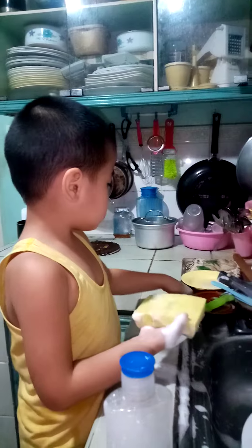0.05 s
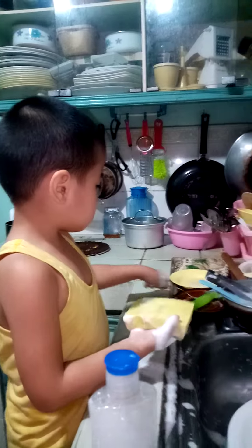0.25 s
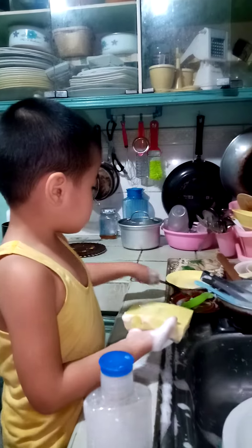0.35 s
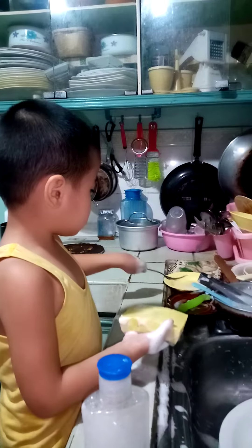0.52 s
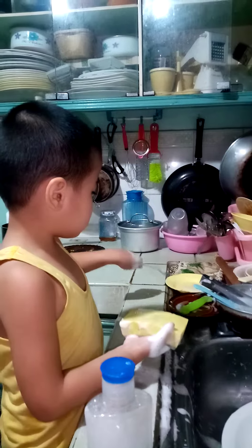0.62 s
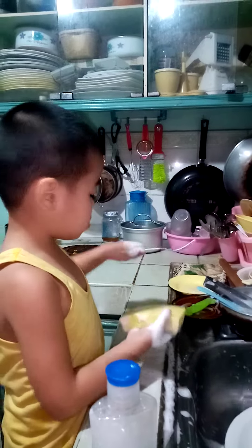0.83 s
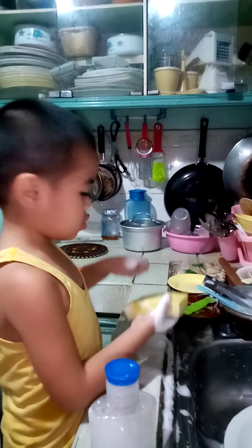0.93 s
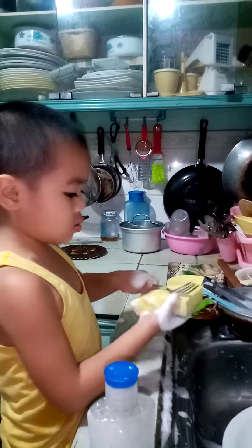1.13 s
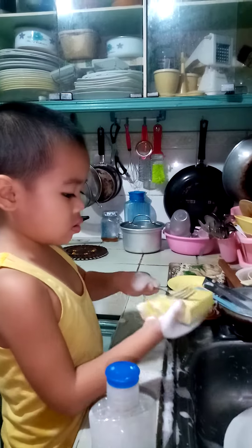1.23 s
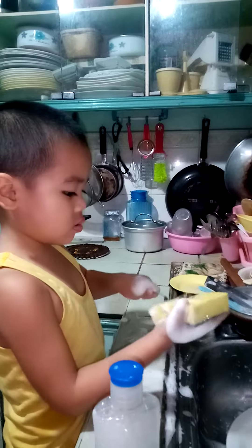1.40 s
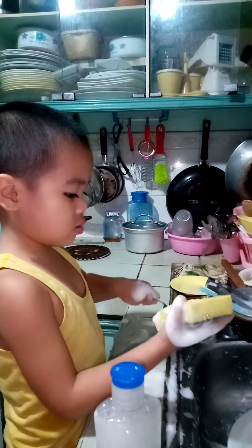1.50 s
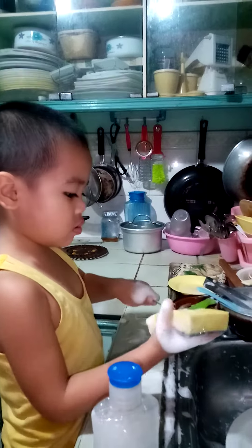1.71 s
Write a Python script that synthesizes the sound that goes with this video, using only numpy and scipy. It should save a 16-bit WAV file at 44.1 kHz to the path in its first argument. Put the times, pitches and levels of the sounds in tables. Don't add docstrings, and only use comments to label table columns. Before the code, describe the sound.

A steel fork clatters on a tiled kitchen counter. Faint water murmur and tiny suds pops open; from 0.2 to 0.4 seconds the fork scrapes and jangles. At 0.45 it drops loudly, bouncing and rattling until about 0.75, with ringing dishes and dull knocks. Damped near 0.8, it gives way to sponge fizz, sparse bubble pops, and a faint dull rub from 1.64, in a small hard room.

```python
import sys
import numpy as np
from scipy import signal
from scipy.fft import rfft, irfft, next_fast_len
from scipy.io import wavfile
from scipy.ndimage import uniform_filter1d

SR = 44100
rng = np.random.default_rng(int(sys.argv[2]) if len(sys.argv) > 2 else 0)


def inscribe(sig):
    pcm = np.round(np.clip(np.atleast_2d(sig).T, -1, 1) * 32767)
    wavfile.write(sys.argv[1], SR, pcm.astype(np.int16))


def natural_amplitude(level_db):
    exponent = np.asarray(level_db, float) / 20
    return 10 ** exponent


N = 77175
TIME = np.arange(N) / SR


def colour(x, points):
    hz, db = np.transpose(points)
    size = next_fast_len(N + 4096)
    at = np.log(np.arange(size // 2 + 1) * SR / size + 1)
    gain = natural_amplitude(np.interp(at, np.log(hz), db))
    return irfft(rfft(x, size) * gain, size)[..., :N]


def rms_one(x):
    return x / np.sqrt(np.mean(x ** 2) + 1e-20)


def noise():
    return rng.standard_normal((2, N))


def ring(clicks, hz, t60):
    r, w = natural_amplitude(-60 / (t60 * SR)), 2 * np.pi * hz / SR
    return signal.lfilter([0, np.sin(w)], [1, -2 * r * np.cos(w), r * r], clicks + 1e-18)


def grains(per_s, spread_db):
    sizes = natural_amplitude(spread_db * np.minimum(rng.exponential(1, (2, N)), 4))
    sizes = sizes * rng.choice([-1, 1], (2, N))
    return rms_one(sizes * (rng.random((2, N)) < per_s / SR))


def burst(start, rise, t60):
    t = np.maximum(TIME - start, 0)
    return (1 - np.exp(-t / max(rise, 1e-4))) * natural_amplitude(-60 * t / max(t60, .005))


def slosh():
    # pitch_hz, level_db per Hz
    water = [(41, -46), (70, -10), (162, 2), (204, -7), (239, -3.5), (1250, -11), (1470, -12.5),
             (4280, -7.5), (16000, -20)]
    settling = burst(-0.057, 0.0072, 2.4)
    fade_out = np.clip((.5 - TIME) / 0.09, 0, 1)
    return natural_amplitude(-45) * rms_one(colour(noise(), water)) * settling * fade_out


def hum():
    # pitch_hz, level_db per Hz
    background = [(24, -23), (40, -6), (118, 0), (873, -20.5), (3300, -43), (4130, -23), (6490, -19),
                  (13400, -32), (16000, -41)]
    return natural_amplitude(-67.5) * rms_one(colour(noise(), background))


def pops():
    # start_s, peak level_db, pitch_hz, breadth_octaves
    suds = [(0.032, -32, 4220, 0.023), (0.056, -41, 4630, 0.04), (0.081, -40.5, 2490, 0.14),
            (0.771, -45.5, 754, 0.094), (0.816, -42.5, 8640, 0.15), (0.863, -38.5, 13200, 3.2),
            (0.871, -40.5, 6750, 0.22), (0.89, -43, 7800, 0.76), (0.927, -41.5, 5350, 0.11),
            (0.96, -41, 7100, 0.86), (0.968, -49.5, 1224, 0.2), (1.023, -32, 10100, 0.82),
            (1.034, -50.5, 4400, 0.13), (1.063, -42, 6500, 0.27), (1.075, -53, 1920, 0.19),
            (1.096, -42, 7360, 0.71), (1.214, -50.5, 6200, 0.87), (1.204, -58, 7500, 0.33),
            (1.271, -53.5, 8700, 0.21), (1.275, -49, 6460, 0.25), (1.279, -49, 4940, 0.58),
            (1.28, -58.5, 2270, 0.2), (1.287, -54, 4520, 0.52), (1.295, -54, 4400, 0.81),
            (1.296, -56, 2310, 0.14), (1.371, -51.5, 6060, 0.25), (1.399, -45, 6300, 0.31),
            (1.399, -42.5, 8660, 0.22), (1.402, -46, 4220, 0.43), (1.453, -46.5, 2610, 0.31),
            (1.454, -42, 5100, 0.56), (1.456, -56, 1614, 0.13), (1.471, -40.5, 3800, 0.41),
            (1.49, -40, 6160, 0.44), (1.458, -47, 5230, 0.24), (1.501, -49, 6300, 0.15),
            (1.519, -44.5, 5660, 0.36), (1.522, -51, 3700, 0.23), (1.532, -45, 4150, 0.35),
            (1.545, -51.5, 2600, 0.47), (1.545, -53, 9150, 0.25), (1.55, -52, 4000, .2),
            (1.565, -46, 5270, 0.27), (1.598, -46, 3950, 0.2), (1.662, -45.5, 5130, 0.45)]
    level_db, spray_db = 0.5, -16
    puff_t60_s, puff_min_cycles, puff_rise_s = .011, 40, .0006
    spray_t60_s, spray_rise_s = .14, .004
    out, white = 0, noise()
    for s, db, hz, breadth in suds:
        edge = 2 ** (max(breadth, .01) / 2)
        limits = [hz / edge, min(hz * edge, .45 * SR)]
        band = signal.butter(3, limits, "band", fs=SR, output="sos")
        puff = burst(s, puff_rise_s, max(puff_t60_s, puff_min_cycles / hz))
        spray = natural_amplitude(spray_db) * burst(s, spray_rise_s, spray_t60_s)
        out = out + natural_amplitude(db + level_db) * rms_one(signal.sosfilt(band, white)) * (puff + spray)
    return out


def crockery(shake):
    t60_s, level_db = .06, 5
    pitches = np.geomspace(900, 14000, 36) * rng.uniform(.96, 1.04, 36)
    peak = t60_s * SR / (2 * np.log(1000))
    dishes = sum(ring(shake, hz, t60_s) for hz in pitches) / peak
    return rms_one(shake + natural_amplitude(level_db) * dishes)


def fork(contacts, pitches, modes, ring_db, tile, tile_db):
    touches_per_s, touch_spread_db, strike_spread_db = 3000, 2.0, 2.0
    first_blow_db = 22
    fall_db_per_octave, floor_db = 45, -15
    force = np.array([natural_amplitude(db) * burst(s, rise, t60) for s, db, rise, t60, _ in contacts])
    octaves = np.abs(np.log2(np.array(contacts)[:, 4:] / pitches))
    nearness_db = np.maximum(-fall_db_per_octave * octaves, floor_db)
    strength = natural_amplitude(strike_spread_db * rng.standard_normal(octaves.shape) + nearness_db)
    touches = grains(touches_per_s, touch_spread_db)
    shake = crockery(colour(.5 * touches + noise(), tile)) * force.sum(axis=0)
    blows = [int((c[0] + c[2]) * SR) for c in contacts]
    touches[:, blows] = natural_amplitude(first_blow_db)
    steel = 0
    for k, (db, t60) in enumerate(modes):
        push = touches * (strength[:, k] @ force)
        steel = steel + natural_amplitude(db) * ring(push, pitches[k], t60) / np.sqrt(t60 * SR / 28)
    return natural_amplitude(ring_db) * steel + natural_amplitude(tile_db) * shake


def dragged_fork():
    # start_s, peak level_db, rise_s, t60_s, struck pitch_hz
    drags = [(.19, -33, 0.0023, 0.19, 6730), (.213, -28.5, 0.0021, 0.22, 5280),
             (.221, -25, 0.003, 0.054, 8350), (.23, -26.5, .003, 0.045, 1794),
             (.247, -27, 0.0046, 0.35, 3732), (.279, -20.5, 0.0022, 0.14, 3732),
             (.288, -21, .002, 0.035, 8330), (.303, -24.5, 0.0017, 0.13, 6470),
             (.314, -26, .003, 0.13, 8330), (.325, -21.5, 0.0055, 0.058, 5900),
             (.333, -27, .003, 0.16, 3732), (.337, -24, 0.0035, 0.035, 6730),
             (.342, -44, 0.0026, 0.16, 1729), (.35, -31, 0.0024, 0.13, 5860),
             (.362, -51, .003, 0.087, 8330), (.37, -27, 0.0025, 0.11, 3732), (.39, -37, 0.016, 1, 4300)]
    held_hz = [1729, 1794, 3732, 4270, 5634, 5842, 5886, 6729, 6690, 8330, 8428, 10030, 11120, 15190]
    # level_db, t60_s
    held = [(-5, .07), (-7, .05), (-6, .035), (-9, .05), (-10, .05), (-5, .06), (-5, .06), (-1, .06),
            (-7, .06), (1, .07), (-8, .05), (-8, .07), (-12, .07), (-14, .05)]
    # pitch_hz, level_db per Hz
    tile = [(41, -39), (70, -23), (129, 4.5), (853, -9), (1760, -6), (3040, -6.5), (6750, 2.5),
            (11900, -5.5), (16000, -0.5)]
    return fork(drags, held_hz, held, -9, tile, -12)


def knocks():
    # start_s, peak level_db
    blows = [
        (.222, -56.5),
        (.281, -39),
        (0.301, -43),
        (.455, -42),
        (.5, -39.5),
        (0.577, -48),
        (0.655, -52),
    ]
    # pitch_hz, level_db, t60_s
    slab = [(131, -6.5, 0.19), (163, -2, 0.31), (231, 0, .15), (288.6, -2.5, 0.22), (461.4, 0, .1)]
    push = np.zeros(N)
    for s, db in blows:
        push[int(s * SR)] = natural_amplitude(db)
    push = signal.sosfilt(signal.butter(2, 90, "high", fs=SR, output="sos"), push)
    ringing = sum(natural_amplitude(db) * ring(push, hz, t60) for hz, db, t60 in slab)
    return uniform_filter1d(ringing, size=41)


def dropped_fork():
    # start_s, peak level_db, rise_s, t60_s, struck pitch_hz
    drops = [(.452, -14, 0.0014, 0.06, 7300), (.465, -11, 0.0017, 0.039, 4000),
             (.471, -21.5, 0.003, 0.13, 6700), (.481, -22, .002, 0.11, 4262),
             (.497, -22, 0.0032, 0.067, 5875), (.499, -23.5, 0.0038, 0.14, 4262),
             (.505, -29, .002, .06, 6700), (.521, -27, .003, 0.16, 6200), (.532, -25.5, 0.0058, 0.34, 3705),
             (.571, -20, 0.0025, 0.097, 4200), (.577, -24.5, 0.0014, 0.13, 6700),
             (.603, -21, 0.0044, 0.07, 3705), (.612, -36.5, .003, 0.087, 6750),
             (.635, -27, 0.0058, 0.15, 3705), (.654, -19, 0.0018, 0.055, 4262),
             (.672, -30, 0.0035, 0.34, 5200), (.69, -36.5, 0.0031, 0.1, 8340),
             (.713, -28, 0.001006, 0.057, 4262), (.735, -37, .005, 0.24, 4262),
             (.738, -54, .005, 0.13, 6800)]
    free_hz = [780, 1674, 3250, 3705, 4170, 4262, 5875, 6692, 6752, 8340, 10080, 11170, 12062, 14255]
    # level_db, t60_s
    free = [(-9, .25), (-6, .08), (-12, .05), (-1, .12), (-14, .06), (2, .055), (-1, .08), (-2, .07),
            (-4, .07), (-2, .1), (-4, .12), (-6, .12), (-4, .14), (-6, .12)]
    # pitch_hz, level_db per Hz
    tile = [(41, -42), (70, -7), (280, 2.5), (3040, -5.5), (4280, 4), (4580, -0.5), (6750, 4.5),
            (10600, -4), (16000, -1.5)]
    return fork(drops, free_hz, free, -9, tile, -8.5)


def fizz():
    # time_s, level_db
    squeeze = [
        (0.75, -44),
        (0.956, -58.5),
        (1.078, -57),
        (1.176, -69),
        (1.346, -69.5),
        (1.612, -59.5),
        (1.75, -67),
    ]
    # pitch_hz, level_db per Hz
    foam = [(410, -4), (700, -10.5), (886, -16), (1260, -8), (3280, -9), (6480, -7.5), (13500, -13.5),
            (15000, -11), (16000, -8)]
    bubbles_per_s, ring_cycles = 2300, 18
    born = grains(bubbles_per_s, 2.5)
    dealt = rng.integers(0, 24, N)
    rings = 0
    for k, hz in enumerate(np.geomspace(900, 15500, 24)):
        rings = rings + ring(born * (dealt == k), hz, ring_cycles / hz) * hz
    s, db = np.transpose(squeeze)
    pressure = natural_amplitude(np.interp(TIME, s, db)) * burst(s[0], 0.082, 83)
    return rms_one(colour(rms_one(rings) + noise(), foam)) * pressure


def rub():
    # pitch_hz, level_db per Hz
    skin = [(59, -60), (100, -13), (314, 0.5), (1080, -25), (1200, -23), (2050, -10), (3500, -26),
            (4550, -71), (7700, -120)]
    return natural_amplitude(-55) * rms_one(colour(grains(620, 0.33), skin)) * burst(1.638, 0.015, 100)


def kitchen(x):
    t60_s, low_hz, gap_s = .16, 300, .0015
    t = np.arange(SR // 2) / SR
    tail = rng.standard_normal((2, len(t))) * natural_amplitude(-60 * t / t60_s) * (t > gap_s)
    tail = signal.sosfilt(signal.butter(2, low_hz, "high", fs=SR, output="sos"), tail)
    tail = tail / np.sqrt(np.sum(tail ** 2) / 2)
    return signal.fftconvolve(x[None], tail, axes=1)[:, :N]


def ports(pair):
    # pitch_hz, share 0-1
    likeness = [(100, 0.94), (250, 0.89), (500, 0.81), (1000, 0.07), (4000, 0), (12000, 0)]
    lag_s = 0.0008809
    alike = [(hz, np.clip(share, .01, .999)) for hz, share in likeness]
    same = colour(pair[0], [(hz, 20 * np.log10(share)) for hz, share in alike])
    other = colour(pair[1], [(hz, 10 * np.log10(1 - share ** 2)) for hz, share in alike])
    return np.array([pair[0], np.roll(same + other, int(lag_s * SR))])


def scene():
    grip_s, grip_t60_s = .79, .2
    grip = natural_amplitude(-60 * np.maximum(TIME - grip_s, 0) / grip_t60_s)
    near = slosh() + hum() + pops()
    near = near + (dragged_fork() + dropped_fork()) * grip + knocks()
    near = near + fizz() + rub()
    return ports(near) + natural_amplitude(-9) * kitchen(near[0])


def roll_off(x):
    return signal.sosfilt(signal.butter(12, 16810, fs=SR, output="sos"), x)


def record(dry):
    # pitch_hz, level_db
    left_port = [(100, -6), (1000, -6.5), (2500, -1.5), (6000, -7), (10000, -9.5), (13000, -51),
                 (14300, -47), (16000, -53)]
    # pitch_hz, level_db
    mic = [(2700, 0.5), (3350, -1), (3900, 2), (9500, 0), (13400, -8.5), (14300, 2), (15400, 7),
           (15900, -22.5)]
    bass_cut_hz, bass_leak_db, top_hz = 96, -16, 16250
    x = np.array([colour(dry[0], left_port), dry[1]])
    x = natural_amplitude(5) * colour(x, mic)
    bass_cut = signal.cheby1(6, 1, bass_cut_hz, "high", fs=SR, output="sos")
    x = signal.sosfilt(bass_cut, x) + natural_amplitude(bass_leak_db) * x
    x = signal.sosfilt(signal.ellip(10, 1, 70, top_hz, fs=SR, output="sos"), x)
    return roll_off(x)


dry = scene()
out = record(dry)
inscribe(out)
```